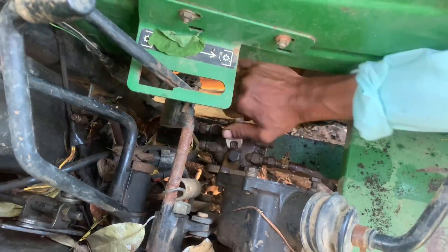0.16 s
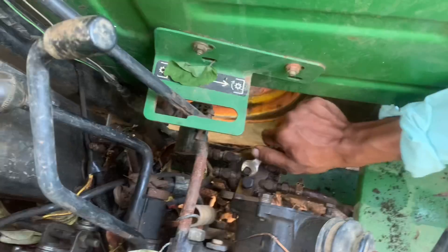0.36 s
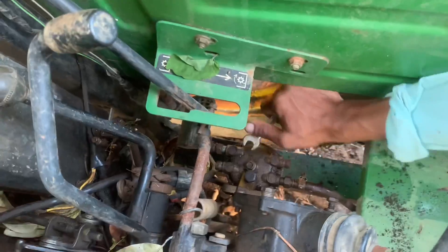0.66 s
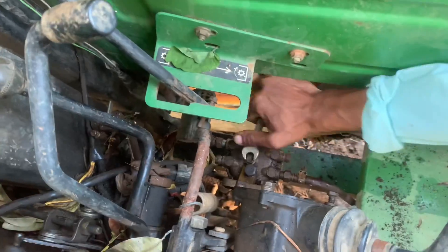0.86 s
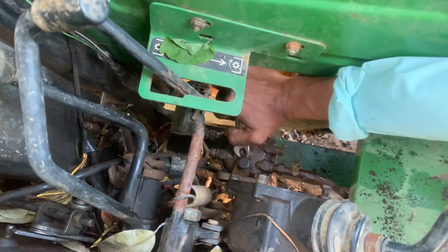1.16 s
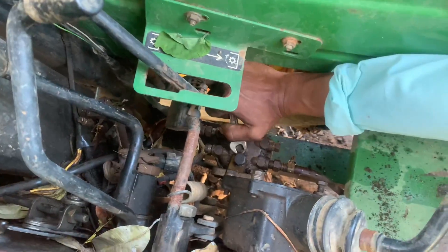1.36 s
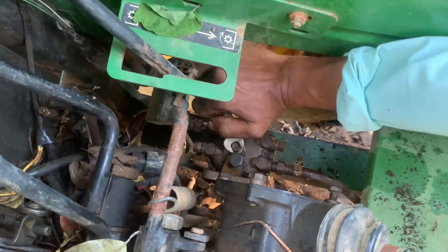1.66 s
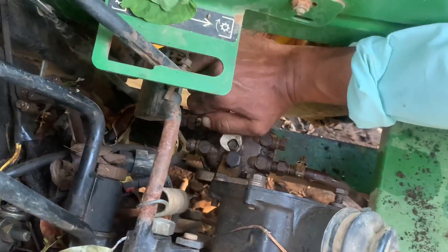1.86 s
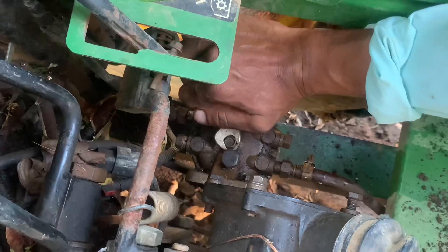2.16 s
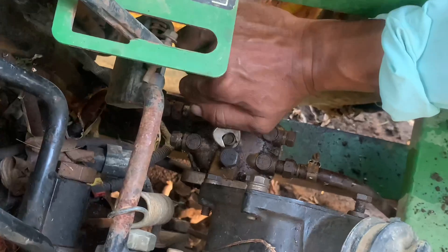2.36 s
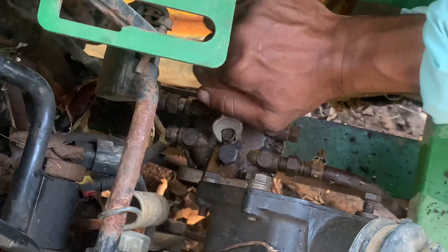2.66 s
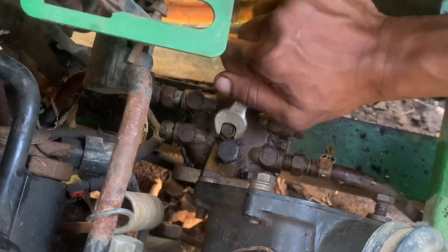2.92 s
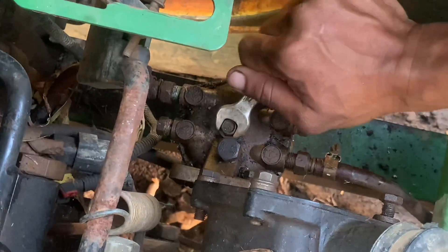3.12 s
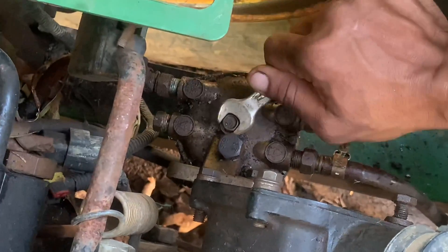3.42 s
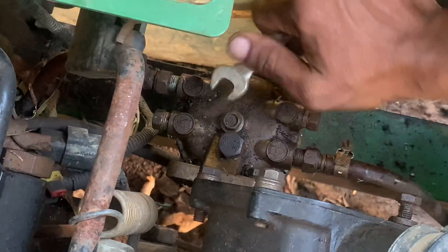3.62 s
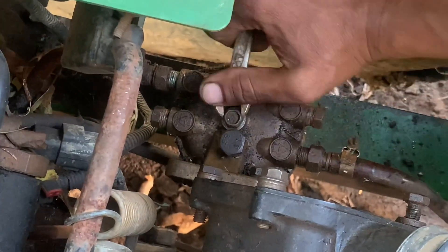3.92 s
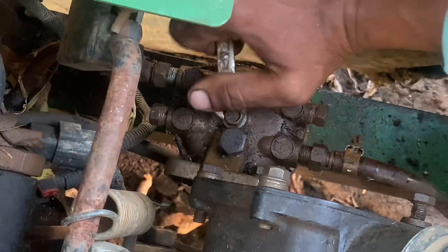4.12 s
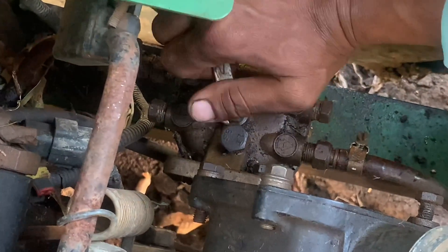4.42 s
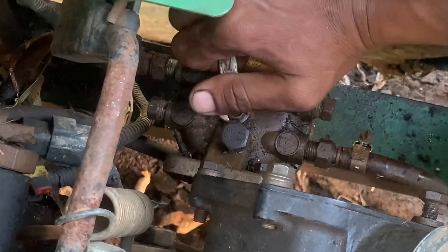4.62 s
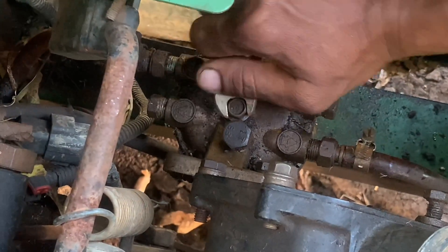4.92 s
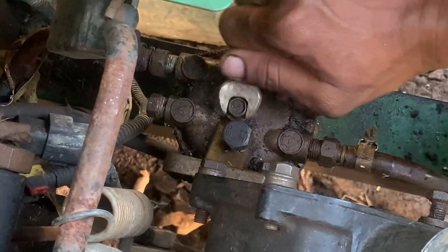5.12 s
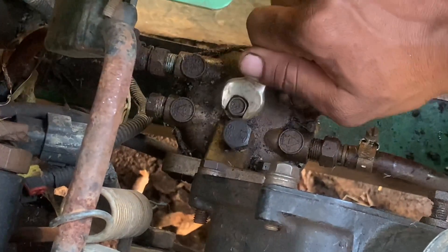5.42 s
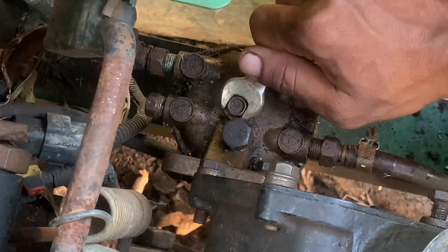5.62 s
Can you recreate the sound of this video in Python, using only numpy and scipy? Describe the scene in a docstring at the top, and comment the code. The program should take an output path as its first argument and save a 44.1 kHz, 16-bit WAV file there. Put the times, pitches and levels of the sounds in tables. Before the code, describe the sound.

Close handling thuds, then scattered metallic wrench clacks on an engine, soft hollow hisses and skin rubs, over high insect chirping and faint rumble.

```python
"""Wrench on an engine's fuel fittings

An open-end wrench is set on the fittings of a stopped tractor engine outdoors: steel contacts excite decaying
modes and dense clatter in the engine bay. Dull knocks and a booming panel come from the working arm.
Soft hollow hisses swell and stop, with faint wavering tones in them; rubs and brushes are shaped noise.
Insects chirp as high gliding tones over a distant rumble. Early on, the sound drops out for a moment."""
import sys
import numpy as np
from scipy import signal
from scipy.io import wavfile

SR = 44100
rng = np.random.default_rng(int(sys.argv[2]) if len(sys.argv) > 2 else 0)


def put_to_file(sound):
    """Save the sound as 16-bit audio at rate SR, in the file named by the first command-line argument."""
    columns = np.atleast_2d(sound).T  # one column per channel
    safe = np.clip(columns, -1, 1)
    whole_steps = np.round(safe * 32767)
    wavfile.write(sys.argv[1], SR, whole_steps.astype(np.int16))


N = 254898
TIME = np.arange(N) / SR
LEFT_RIGHT = np.array([[1], [-1]])   # opposite signs for the two channels
EDGES = 22 * 2 ** np.arange(0, 9.9, 1 / 3)   # third-octave band edges in Hz
TREBLE_TOP_HZ, CUTOFF_HZ = 13660, 15800   # upper limits of the work, grip and background, and of the whole


def from_db(db):
    """Logarithmic level: decibels to amplitude gain."""
    return 10 ** (np.asarray(db) / 20)


def rms_one(x):
    """Power normalization: scale to unit mean square."""
    return x / np.sqrt(np.mean(x ** 2) + 1e-20)


def at_hz(points, hz):
    """Spectral interpolation: read a table on a log-frequency axis."""
    table = np.array(points)
    return np.interp(np.log(hz), np.log(table[:, 0]), table[:, 1])


def add(out, s, sound):
    """Superposition: mix a sound into out at time s in seconds."""
    start = max(round(s * SR), 0)
    out[:, start:start + sound.shape[1]] += sound[:, :N - start]


def band(x, low, high):
    """Band limitation: keep the sound between two frequencies in Hz."""
    return signal.sosfilt(signal.butter(2, [low, high], "band", fs=SR, output="sos"), x)


def waver(per_s):
    """Random modulation: straight lines between normal random points, per_s of them a second."""
    return np.interp(TIME * per_s, np.arange(4096), rng.standard_normal(4096))


def hold(start, end):
    """Gradual envelope: fade in over 0.1 s, hold and fade out over 0.062 s."""
    return np.clip(np.minimum((TIME - start) / 0.1, (end - TIME) / 0.062), 0, 1)


def swell(start, top, end, growth_db):
    """Exponential growth: the level rises in dB up to its strongest moment, then fades out."""
    growth = from_db(growth_db * np.minimum(TIME - top, 0) / (top - start))
    return growth * np.interp(TIME, [start, (start + top) / 2, top, end], [0, 1, 1, 0])


def noise_bands(likeness, size):
    """Stereo coherence: third-octave noises as (Hz, noise), of unit power per kHz and set left-right likeness."""
    white = rng.standard_normal((2, 2, size + SR // 4)) * np.sqrt(SR / 2000)
    for k, (low, high) in enumerate(zip(EDGES, EDGES[1:])):
        # neighbouring bands use independent noise; the filter's onset is cut away
        mid, side = band(white[k % 2], low, high)[:, -size:]
        hz = np.sqrt(low * high)
        alike = at_hz(likeness, hz)
        yield hz, np.sqrt((1 + alike) / 2) * mid + np.sqrt((1 - alike) / 2) * side * LEFT_RIGHT


def coloured_noise(colour, likeness, size):
    """Spectral shaping: noise bands weighted by a table of density in dB against frequency."""
    return sum(from_db(at_hz(colour, hz)) * noise for hz, noise in noise_bands(likeness, size))


def soften(hz, hard_hz):
    """Contact duration: loss in dB above the pitch that a contact can still excite."""
    return -10 * np.log10(1 + (hz / hard_hz) ** 3)


def ring(modes, decay, spread, rise_s):
    """Modal decay: struck modes, weighted anew by each blow and out of phase between the two channels."""
    longest_s = max(t60 for hz, db, t60 in modes) * decay
    t, out = TIME[:round(SR * (longest_s + .02))], 0
    for hz, db, t60 in modes:
        weight, phase, side = rng.standard_normal(3)
        turn = 2 * np.pi * (hz * t + phase) + spread * np.sign(side) * LEFT_RIGHT
        level_db = db + 1.0 * weight - 60 * t / (t60 * decay)   # 1 dB of scatter
        out = out + from_db(level_db) * np.sin(turn)
    return out * (1 - np.exp(-t / rise_s))


# Decay of the engine bay. Each row: frequency in Hz, t60 in seconds before each blow's decay factor.
BAY_T60 = [(60, 0.5), (230, 0.14), (500, 0.32), (1200, 0.17), (2500, 0.19), (5000, 0.12), (14000, 0.087)]


def clatter(blows, colour, likeness, crack_db, crack_s):
    """Dense modes and reflections: a short crack, then a noise tail that mostly dies sooner in the treble."""
    out, t = np.zeros((2, N)), TIME[:SR // 3]
    crack = 1 + from_db(crack_db) * np.exp(-t / crack_s)
    for hz, noise in noise_bands(likeness, N):
        power = np.zeros((1, N))
        for s, strength, decay, rise_s in blows:
            attack = crack * (1 - np.exp(-t / rise_s))
            fall_db = -60 * t / (at_hz(BAY_T60, hz) * decay)
            envelope = attack * from_db(at_hz(strength, hz) + fall_db)
            add(power, s, envelope[None] ** 2)
        out += from_db(at_hz(colour, hz)) * np.sqrt(power) * noise
    return out


# Colour of the air outside. Each row: frequency in Hz, relative density in dB per Hz.
AIR_COLOUR = [(15, -50), (25, -29), (60, 1), (172, -8.5), (250, -27.5), (293, -13.5), (621, -18.5),
              (811, -21.5), (3730, -25.5), (4620, -34), (8550, -25.5), (10600, -33.5), (11800, -43),
              (13100, -27), (15000, -100)]
# Stereo likeness of airborne noise. Each row: frequency in Hz, left-right correlation (1 is identical).
LIKENESS = [(60, 0.86), (120, 0.5), (250, 0), (600, 0.43), (1300, 0.066), (3000, 0), (14000, 0.093)]


def air():
    """Stationary noise: a steady distant rumble under a thin hiss."""
    return from_db(-55.5) * rms_one(coloured_noise(AIR_COLOUR, LIKENESS, N))


# Chirps of the nearest insect. Each row: start in seconds, relative level in dB.
CHIRPS = [(0.408, -68), (0.642, -60), (0.871, -57), (1.102, -61), (1.33, -67.5), (2.38, -60), (2.647, -60),
          (2.844, -57.5), (3.033, -59), (3.231, -55.5), (3.457, -57), (3.646, -59), (3.871, -61),
          (4.102, -63), (4.33, -59.5), (4.568, -58.5), (4.797, -57.5), (4.989, -56), (5.223, -56),
          (5.456, -57), (5.678, -58)]


def insects(top_hz, sweep_hz, syllable_s, period_s, echo_s, echo_db):
    """Frequency glide and echo: one insect sings three falling syllables a chirp; far ones merge into a tone."""
    near, part = np.zeros((2, N)), TIME[:round(syllable_s * SR)] / syllable_s
    for s, db in CHIRPS:
        for k, swell_db in enumerate((-5, -1, -1)):
            hz = top_hz + 45 * rng.standard_normal() - sweep_hz * part   # 45 Hz of scatter
            syllable = np.sin(np.pi * part) * np.sin(2 * np.pi * np.cumsum(hz) / SR)
            start = s + k * period_s
            if start < TIME[-1]:
                syllable_db = db + swell_db + 1.5 * rng.standard_normal((2, 1))
                add(near, start, from_db(syllable_db) * syllable)
    t = TIME[:SR // 4]
    echoes = rng.standard_normal((2, len(t))) * np.exp(-t / echo_s)
    echoes /= np.sqrt(np.sum(echoes ** 2, axis=1, keepdims=True))
    wet = signal.fftconvolve(near, echoes, axes=1)[:, :N]
    # the far insects swell and fade together
    chorus_gain = from_db(-65 + 2.2 * waver(35))
    far = chorus_gain * rms_one(band(rng.standard_normal((2, N)), 4100, 4845))
    # foliage weakens the direct path by 3 dB
    return from_db(-3) * near + from_db(echo_db) * wet + far


TONE_WANDER_HZ, TONE_WANDERS_PER_S, TONE_FLUTTER_DB = 13.5, 120, 6   # of the whistle and the faint tones


def whistle():
    """Exponential glide: a thin, fluttering tone that falls quickly and levels off."""
    start_s, end_s, first_hz, last_hz, glide_s = 0.49, 0.66, 2950, 2350, 0.045
    hz = last_hz + (first_hz - last_hz) * np.exp(-np.maximum(TIME - start_s, 0) / glide_s)
    hz = hz + 2 * TONE_WANDER_HZ * waver(TONE_WANDERS_PER_S)
    gain = from_db(-70 + TONE_FLUTTER_DB * waver(TONE_WANDERS_PER_S)) * hold(start_s, end_s)
    return gain * np.sin(2 * np.pi * np.cumsum(hz) / SR)


# Soft hollow hisses that swell and stop. Each row: start, strongest moment and end in seconds,
# hiss level in dB, nominal high tone level in dB, nominal low tone level in dB.
HISSES = [(2.765, 3.446, 3.52, -53, -55, -68), (5.06, 5.33, 5.45, -57, -65.5, -64)]
# Narrow resonances of the hiss. Each row: frequency in Hz, width in Hz, relative level in dB.
HISS_RESONANCES = [(687, 110, -3), (1178, 96, 0.5), (1500, 600, -4), (1912, 28, 2), (2030, 70, -2.5),
                   (2310, 70, -7), (2603, 56, 0), (2480, 970, -4.5), (3000, 27, -8), (3240, 52, -15),
                   (3560, 240, -3.5)]


def hollow_hiss(impulses_per_s, size_db, mid_weight):
    """Resonant filtering: dense random impulses through narrow resonances give a soft hollow hiss."""
    # each hiss grows by 7.5 dB from its start to its strongest moment
    level = sum(from_db(db) * swell(start, top, end, 7.5) for start, top, end, db, *tone_dbs in HISSES)
    impulses = (rng.random(N) < impulses_per_s / SR) * from_db(size_db * rng.standard_normal(N))
    mid, side = impulses * rng.standard_normal((2, N))
    drive, out = mid_weight * mid + side * LEFT_RIGHT, 0
    for hz, width, db in HISS_RESONANCES:
        r = np.exp(-np.pi * width / SR)   # pole radius
        poles = [1, -2 * r * np.cos(2 * np.pi * hz / SR), r * r]
        out = out + from_db(db) * rms_one(signal.lfilter([1, 0, -1], poles, drive))
        drive = -drive   # consecutive resonances are driven in opposite phase
    return level * rms_one(out)


def faint_tones(spread):
    """Random frequency modulation: two faint wavering tones, near 2626 and 1108 Hz, swell with each hollow hiss."""
    out = 0
    for k, hz in enumerate((2626, 1108)):
        level = sum(from_db(dbs[k]) * swell(start, top, end, growth_db=25)
                    for start, top, end, hiss_db, *dbs in HISSES)
        turn = 2 * np.pi * np.cumsum(hz + TONE_WANDER_HZ * waver(TONE_WANDERS_PER_S)) / SR
        flutter = from_db(TONE_FLUTTER_DB * waver(TONE_WANDERS_PER_S))
        out = out + level * flutter * np.sin(turn + spread * LEFT_RIGHT)
    return out


# Soft pushes on the sheet metal. Each row: start in seconds, relative level in dB, decay factor.
PUSHES = [(0.119, -62, 0.59), (0.685, -41, 1), (2.188, -51.5, 0.55), (2.29, -46.5, 0.16),
          (3.671, -38, 0.12)]
# Modes of the panel. Each row: frequency in Hz, relative level in dB, t60 in seconds before the decay factor.
PANEL_MODES = [(65, -10, 0.44), (104.5, 3, 1), (164.7, -4.5, 0.77), (172.4, -5, 0.45), (259, -13.5, 0.22),
               (283.6, -8.5, 0.25)]


def panel():
    """Plate modes: the sheet metal booms softly when the arm presses on it."""
    out = np.zeros((2, N))
    for s, db, decay in PUSHES:
        add(out, s, from_db(db) * ring(PANEL_MODES, decay, spread=0.29, rise_s=0.0063))
    return out


# The hand slides along the wrench. Each row: start in seconds, end in seconds, level in dB.
SLIDES = [(0.584, 1.228, -61), (2.37, 2.726, -54), (2.66, 3.545, -58), (3.54, 4.278, -57.5),
          (4.897, 5.413, -57)]
# Colour of sliding skin. Each row: frequency in Hz, relative density in dB per Hz.
SKIN_COLOUR = [(200, -5), (700, -5), (3000, -3.5), (7000, -6.5), (8600, -3), (10300, 0.5), (11800, -5),
               (13200, 0.5), (16000, -20)]


def slides(flicker_db, flickers_per_s):
    """Friction noise: skin sliding on steel gives a thin, slightly uneven hiss."""
    level = sum(from_db(db) * hold(start, end) for start, end, db in SLIDES)
    hiss = rms_one(coloured_noise(SKIN_COLOUR, LIKENESS, N))
    return level * from_db(flicker_db * waver(flickers_per_s)) * hiss


# The hand brushes the engine. Each row: start, strongest moment and end in seconds, level in dB.
BRUSHES = [(2.136, 2.18, 2.7, -65), (3.55, 3.657, 3.8, -60.5), (4.614, 4.638, 4.69, -65),
           (5.565, 5.72, 5.7, -61.5)]
# Colour of the brushing. Each row: frequency in Hz, relative density in dB per Hz.
BRUSH_COLOUR = [(150, -10), (420, 10.5), (650, 2.5), (850, 5), (1250, 3), (2000, -12), (3500, -34),
                (16000, -58)]


def brushes(lumps_db, lumps_per_s):
    """Modulated friction noise: knuckles drag over the casting with a dull, lumpy rustle."""
    level = sum(from_db(db) * np.interp(TIME, [start, top, end], [0, 1, 0]) for start, top, end, db in BRUSHES)
    rustle = rms_one(coloured_noise(BRUSH_COLOUR, LIKENESS, N))
    return level * from_db(lumps_db * waver(lumps_per_s)) * rustle


# Small dry ticks of the jaw shifting on the nut. Each row: start in seconds, level in dB,
# upper limit of the click in Hz, ring frequency in Hz, nominal ring level against the click in dB.
TICKS = [(0.189, -38, 11000, 2020, -20), (2.71, -45.5, 1500, 670, -5), (2.8, -41, 3000, 1210, -18),
         (2.823, -42, 1800, 646, -9), (2.869, -35.5, 4000, 1250, -19), (2.903, -37.5, 2500, 3680, -10),
         (4.227, -45, 2000, 850, -10), (4.631, -44.5, 1200, 580, -5), (5.33, -44, 1600, 1120, -19),
         (5.62, -38.5, 3000, 410, -13), (5.691, -42, 700, 415, -7), (5.726, -40.5, 3000, 1230, -18)]


def ticks(tail_s, tail_db, ring_t60_s):
    """Impulse response: a tiny slip is one dull click with a scattered tail, and briefly rings the nearest part."""
    out, t = np.zeros((2, N)), TIME[:SR // 20]
    for s, db, dull_hz, ring_hz, ring_db in TICKS:
        tail = from_db(tail_db) * rng.standard_normal((2, len(t))) * np.exp(-t / tail_s)
        dull = signal.butter(1, [350, dull_hz], "band", fs=SR, output="sos")
        click = signal.sosfilt(dull, (t == 0) + tail)
        add(out, s, from_db(db) * click / np.abs(click).max())
        mode = [(ring_hz, ring_db, ring_t60_s)]
        add(out, s, from_db(db) * ring(mode, 0.88, spread=0.28, rise_s=0.00081))
    return out


# Colour of the hand on the microphone's case. Each row: frequency in Hz, relative density in dB per Hz.
GRIP_COLOUR = [(20, -33), (45, 4), (100, -4), (200, -5.5), (800, -14), (1600, -19.5), (3000, -25),
               (5000, -31.5), (7500, -22), (10000, -41), (12500, -25), (16000, -77)]
# Stereo likeness of sound through the case. Each row: frequency in Hz, left-right correlation (1 is identical).
KNOCK_LIKENESS = [(200, 1), (380, 0.98), (700, -0.3), (1300, -0.23), (3000, -0.6), (12000, 0.52)]


def grip():
    """Structure-borne friction: skin rubbing on the case gives a lumpy rumble with a thin rustle."""
    rub = coloured_noise(GRIP_COLOUR, KNOCK_LIKENESS, SR // 2)
    # a hollow in the treble, 2100 Hz wide
    rub = signal.lfilter(*signal.iirnotch(9500, 9500 / 2100, fs=SR), rub)
    rub = signal.sosfilt(signal.butter(12, TREBLE_TOP_HZ, fs=SR, output="sos"), rub)
    lumps = from_db(-39.5 + 3 * waver(140))
    return lumps * hold(0.055, 0.414) * np.pad(rub, ((0, 0), (0, N - SR // 2)))


# Dull knocks. Each row: start in seconds, relative body level in dB, relative thud level in dB, decay factor,
# treble against body in dB, rise time constant of the clatter in seconds.
KNOCKS = [(0.069, -33.5, -32, 0.66, 4, 0.0063), (0.081, -26.5, -30.5, 0.61, 4, 0.0027),
          (0.094, -34, -24, 0.63, -5, .002), (0.245, -30.5, -36, 0.69, -7, 0.0073),
          (0.264, -42.5, -36.5, 0.86, -16, .003), (0.291, -50, -30, 0.75, -10, 0.0042),
          (0.324, -31, -70, 0.82, -9, 0.0025), (0.335, -38, -60, 1, -19, 0.0028)]
# Colour of the thud. Each row: frequency in Hz, relative density in dB per Hz.
THUD_COLOUR = [(40, -11), (130, -4), (230, 6), (350, 2.5), (600, 5.5), (900, 1), (1300, -1), (2000, -5.5),
               (2800, -3), (5000, -12), (9000, -20), (16000, -51)]
# Modes of the hollow housing, then of the engine casting (which the wrench rings too).
# Each row: frequency in Hz, relative level in dB, t60 in seconds before the decay factor.
HOUSING_MODES = [(219.7, 7.5, 0.65), (291, 15, 0.11), (333, 11, 0.084), (423.7, 3.5, 0.47),
                 (549, 7.5, 0.36), (641, 2, 0.23), (743, -17, .18), (865, 2.5, 0.28), (1173, 8.5, 0.18)]
ENGINE_MODES = [(569.5, -1.5, .22), (631.5, -8, .17), (882, -5, 0.11), (933, -6, 0.09), (1032, 0.5, 0.212),
                (1120, -4.5, 0.22), (1194, 3, 0.15), (1230, 12, 0.051), (1304, 3.5, 0.088),
                (1512, -6.5, 0.13), (1600, 1, .08), (1780, -5, 0.22), (1890, -12, 0.16), (1942, -1.5, 0.12),
                (2040, -3, 0.11), (2140, -6, .14), (2185, 7.5, 0.057), (2278, -1, .06), (2715, -23, .1),
                (3410, -13, 0.14), (3633, -7.5, 0.078), (4220, 1.5, 0.045)]


def knocks():
    """Damped impact: padded blows close to the microphone thud and ring the casting and a hollow housing."""
    blows = []
    for s, body_db, thud_db, decay, treble_db, rise_s in KNOCKS:
        strength = [(400, thud_db), (1100, body_db), (2000, body_db), (4000, body_db + treble_db)]
        blows.append((s, strength, decay, rise_s))
    out = from_db(-4.0) * clatter(blows, THUD_COLOUR, KNOCK_LIKENESS, crack_db=9.5, crack_s=0.0013)
    for s, body_db, thud_db, decay, treble_db, rise_s in KNOCKS:
        add(out, s, from_db(body_db - 6) * ring(ENGINE_MODES, decay=0.57, spread=0.91, rise_s=2 * rise_s))
    s, thud_db = KNOCKS[1][0], KNOCKS[1][2]   # only the hardest blow sets the housing ringing
    add(out, s, from_db(thud_db - 8.5) * ring(HOUSING_MODES, 0.7, spread=0.054, rise_s=0.0031))
    return out * from_db(LEFT_RIGHT)   # 1 dB up on the left, 1 dB down on the right


# Wrench on fitting. Each row: start in seconds, body level in dB, hardness in Hz, then ring levels in dB
# of the fuel pipe, the jaw, the shank and the prong; all levels are relative.
CONTACTS = [(0.832, -39, 13200, -49.5, -32.5, -10, -32), (0.9063, -52, 8940, -64, -59, -63, -70),
            (0.931, -50.5, 7560, -61, -56, -49, -68), (1.078, -55.5, 2250, -66, -67, -80, -76),
            (1.095, -43, 3400, -57.5, -67, -53, -65), (1.249, -55, 2000, -60.5, -78, -76, -77),
            (1.975, -45.5, 16700, -44.5, -62, -36, -51), (2.164, -55, 1900, -65, -79, -79, -82),
            (3.842, -38.5, 5360, -54, -50.5, -38, -65), (3.8785, -39, 5500, -54, -58, -60, -44),
            (3.91, -43.5, 4860, -56, -59, -42, -57), (3.9362, -38, 3060, -50, -53, -48, -69),
            (3.9425, -38, 2380, -60, -63, -54, -70), (4.3903, -28, 5000, -49.5, -44.5, -43, -46)]
# Modes of the fuel pipe and of the wrench's jaw, shank and prong.
# Each row: frequency in Hz, relative level in dB, t60 in seconds before the decay factor.
PIPE_MODES = [(436.3, 4, 0.25), (450, -2, 0.092), (492.6, 0, 0.23)]
JAW_MODES = [(3670, 2, 0.038), (3890, 25, 0.019), (3680, 1.8, 0.11), (4040, 4, 0.027), (6100, 13, 0.03),
             (6490, 19, 0.027), (6740, 10.2, 0.066), (7600, 13, 0.038), (8000, 14, .025)]
SHANK_MODES = [(9682, 0, .055), (13646, -11, .05)]
PRONG_MODES = [(5315, -2, .09), (12930, 1.5, .045), (13450, -2, .035)]
# Colour of the clatter in the engine bay. Each row: frequency in Hz, relative density in dB per Hz.
CLATTER_COLOUR = [(100, -43), (300, -26), (550, -5.5), (800, -8.5), (1150, 7.5), (1600, -3.5), (2200, -4),
                  (3000, 0.5), (4000, 1), (7000, -7.5), (8600, -4), (10300, 7), (13000, -9), (16000, -32)]


def wrench():
    """Modal excitation by impact: each contact rings the casting, the fuel pipe, the jaw and the wrench itself."""
    edge_db_per_octave, even_hz = 11.5, 7370   # at even_hz of hardness the crack is as strong as the body
    echo_s, echo_db = 0.0056, -13.5   # the bay's wall throws each crack back
    bay_decay = 0.59   # share of the bay's ring time left while the hand holds the wrench
    crack_rise_s = 0.00024   # steel meets steel almost at once
    out, blows = np.zeros((2, N)), []
    left = from_db(1.1 * LEFT_RIGHT)   # the engine lies a little to the left
    for s, body_db, hard_hz, pipe_db, jaw_db, shank_db, prong_db in CONTACTS:
        # a glancing contact lasts longer and so loses its treble
        edge_db = body_db + edge_db_per_octave * np.log2(hard_hz / even_hz)
        jaw = [(hz, db + soften(hz, hard_hz), t60) for hz, db, t60 in JAW_MODES]
        add(out, s, left * from_db(body_db - 7.5) * ring(ENGINE_MODES, decay=0.98, spread=0.55, rise_s=0.0044))
        add(out, s, left * from_db(pipe_db) * ring(PIPE_MODES, decay=0.91, spread=0.47, rise_s=0.0018))
        add(out, s, from_db(jaw_db) * ring(jaw, decay=0.78, spread=0.67, rise_s=0.0049))
        add(out, s, from_db(shank_db) * ring(SHANK_MODES, decay=0.8, spread=0.56, rise_s=0.0019))
        add(out, s, from_db(prong_db) * ring(PRONG_MODES, decay=1, spread=0.61, rise_s=0.00048))
        strength = at_hz([(2200, body_db), (4000, edge_db)], EDGES) + soften(EDGES, hard_hz)
        blows.append((s, np.c_[EDGES, strength], bay_decay, crack_rise_s))
        blows.append((s + echo_s, np.c_[EDGES, strength + echo_db], bay_decay, crack_rise_s))
    bay = clatter(blows, CLATTER_COLOUR, LIKENESS, crack_db=0, crack_s=0.0005)
    return out + from_db(-4.0 + .5 * LEFT_RIGHT) * bay


# Two hollows in the treble of work and background. Each row: frequency in Hz, width in Hz.
TREBLE_HOLLOWS = [(8650, 2840), (11800, 3200)]


def shape_treble(x):
    """Spectral shaping: two hollows in the treble and a dull top."""
    for hz, width_hz in TREBLE_HOLLOWS:
        x = signal.lfilter(*signal.iirnotch(hz, hz / width_hz, fs=SR), x)
    return signal.sosfilt(signal.butter(12, TREBLE_TOP_HZ, fs=SR, output="sos"), x)


def scene():
    """Superposition: work and background with shaped treble, then knocks and grip straight through the case."""
    work = wrench() + panel() + brushes(lumps_db=4.5, lumps_per_s=140)
    work = work + ticks(tail_s=0.0014, tail_db=1.5, ring_t60_s=0.044)
    soft = hollow_hiss(impulses_per_s=2300, size_db=1.0, mid_weight=1.13) + faint_tones(spread=0.59)
    soft = soft + whistle() + slides(flicker_db=2.7, flickers_per_s=18)
    chirps = insects(top_hz=5000, sweep_hz=650, syllable_s=0.03, period_s=0.039, echo_s=0.03, echo_db=1.5)
    return shape_treble(work + soft + air() + chirps) + knocks() + grip()


def record(dry):
    """Gating and band limitation: the sound drops out once, and the top is cut."""
    dropout_start_s, dropout_end_s = 0.346, 0.393
    live = (TIME < dropout_start_s) | (TIME > dropout_end_s)
    return signal.sosfilt(signal.ellip(10, .1, 80, CUTOFF_HZ, fs=SR, output="sos"), dry * live)


dry = scene()
out = record(dry)
put_to_file(out)
```